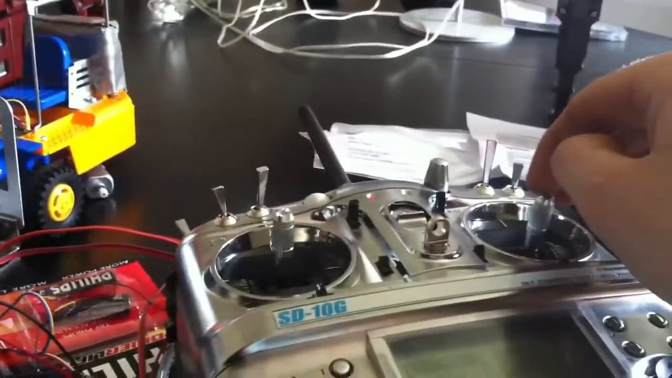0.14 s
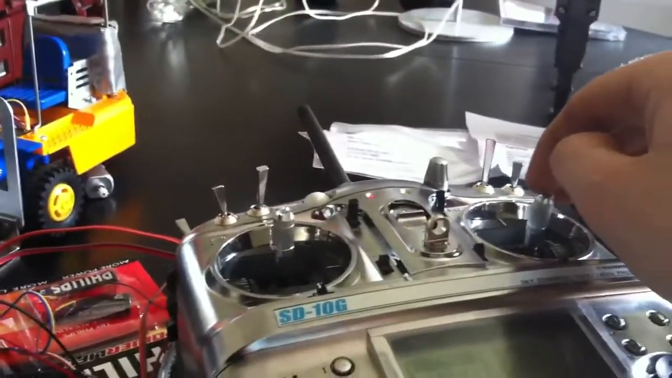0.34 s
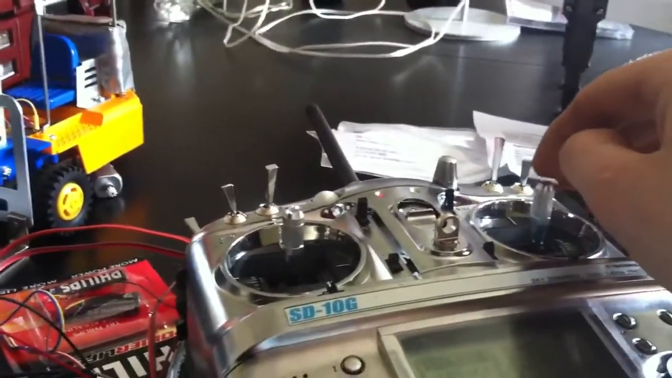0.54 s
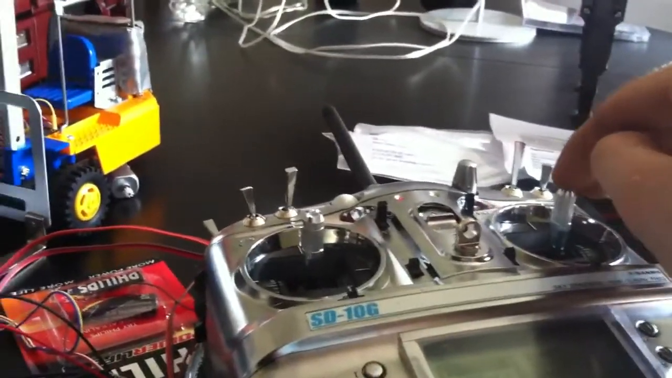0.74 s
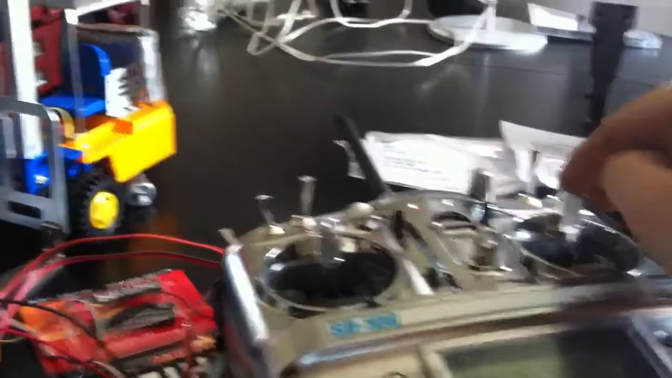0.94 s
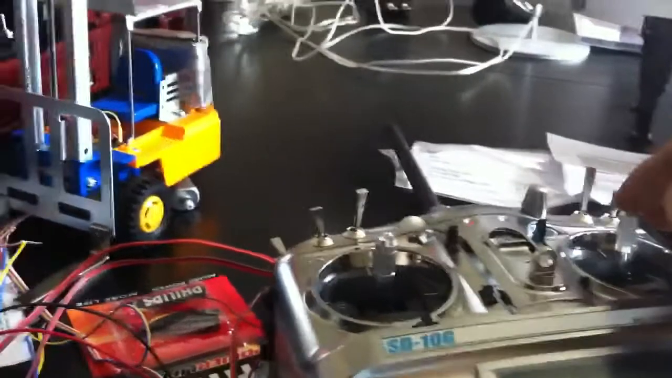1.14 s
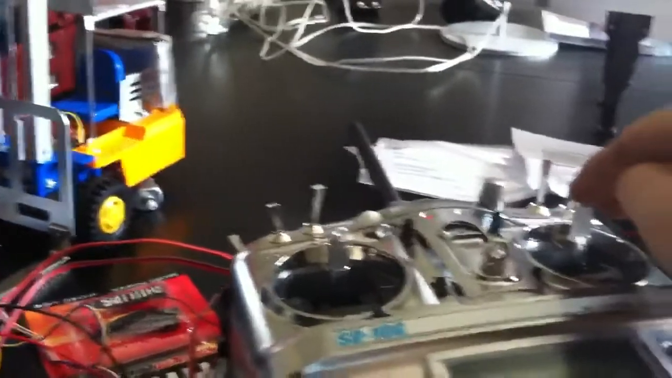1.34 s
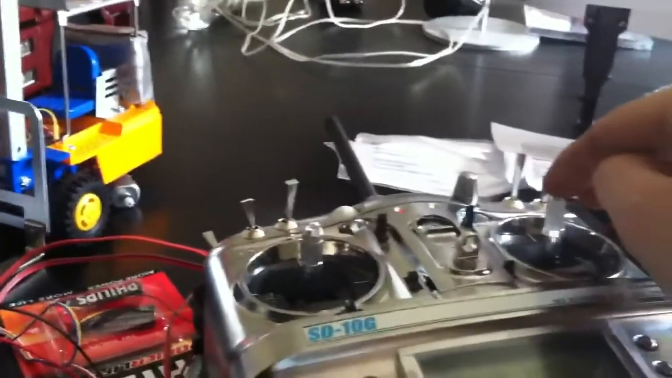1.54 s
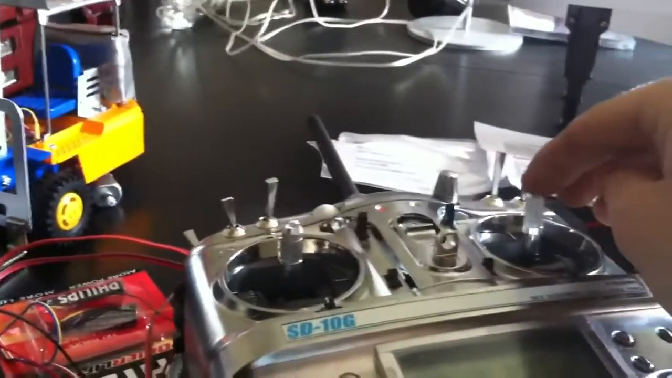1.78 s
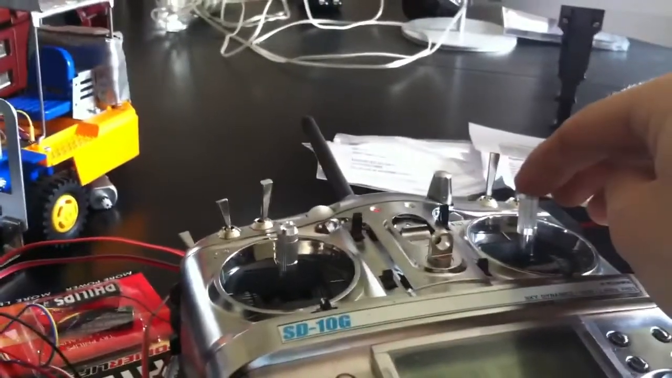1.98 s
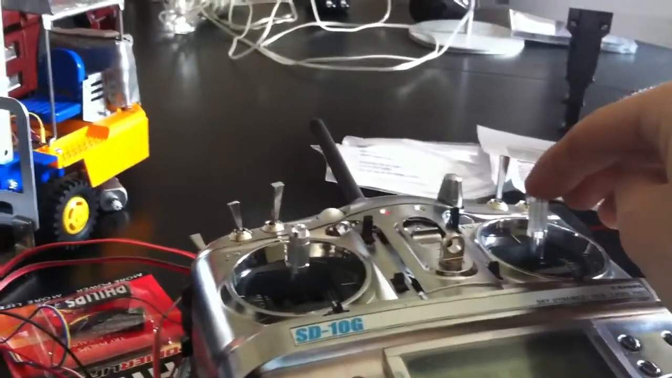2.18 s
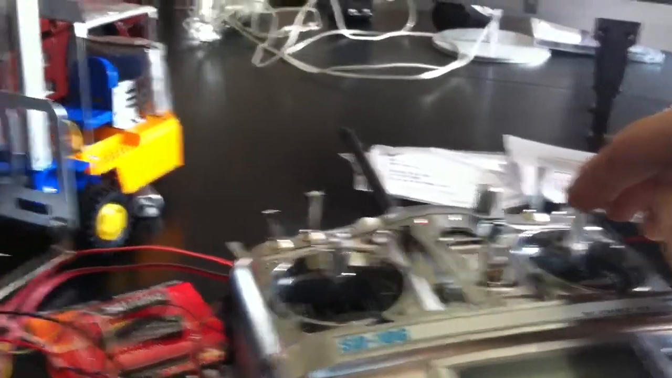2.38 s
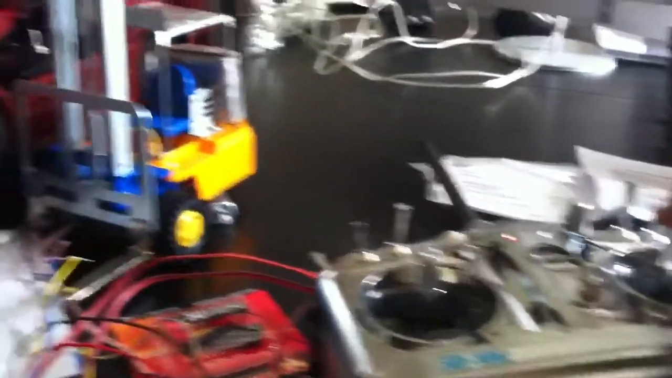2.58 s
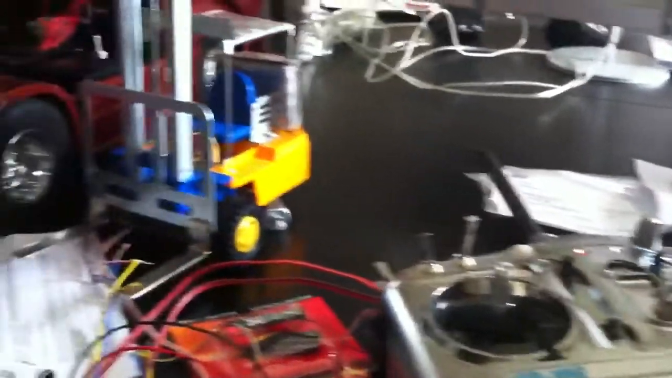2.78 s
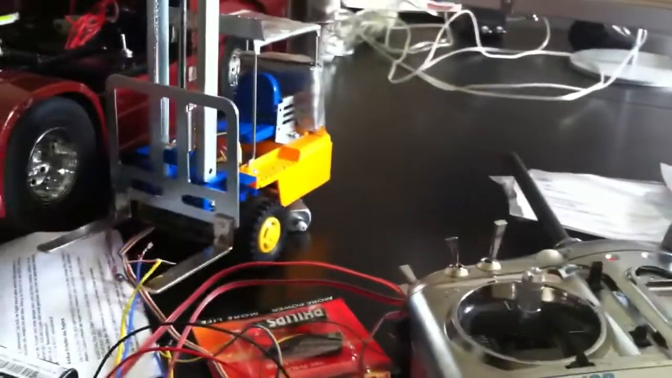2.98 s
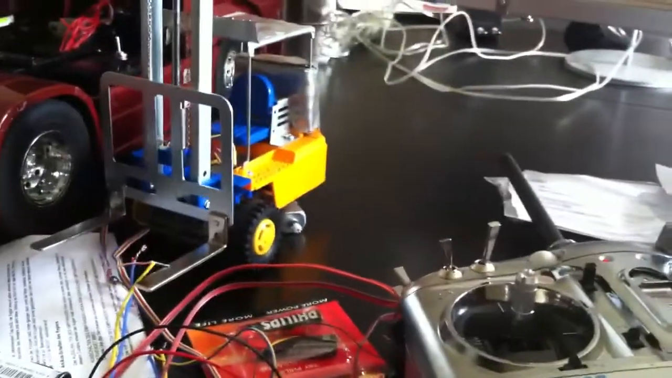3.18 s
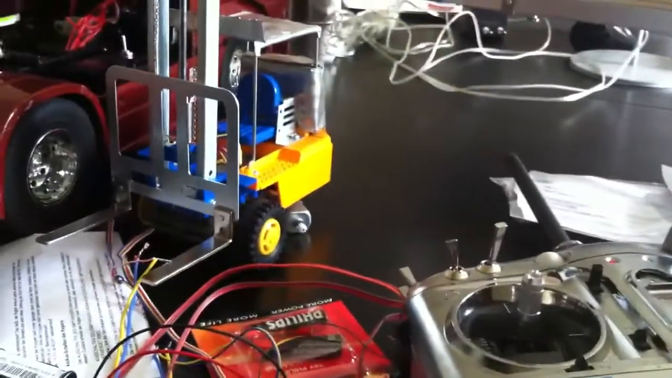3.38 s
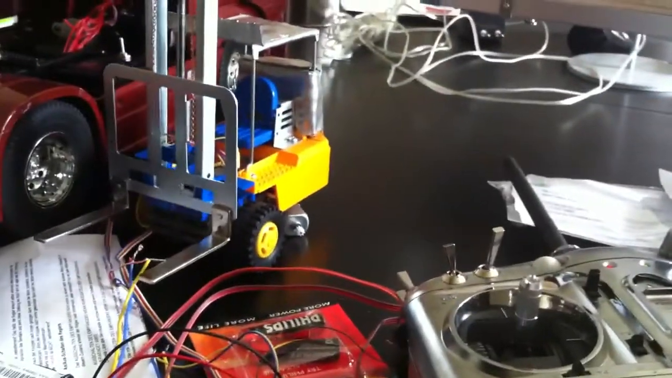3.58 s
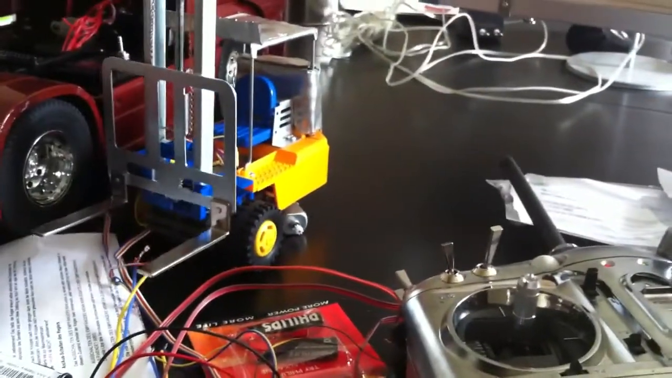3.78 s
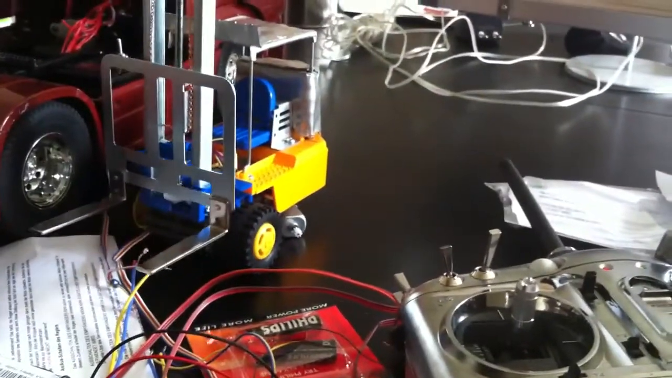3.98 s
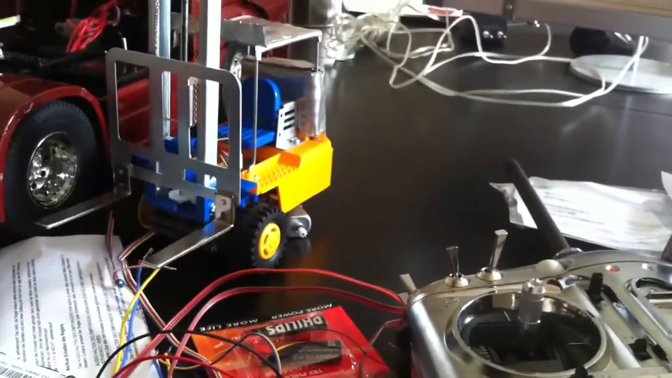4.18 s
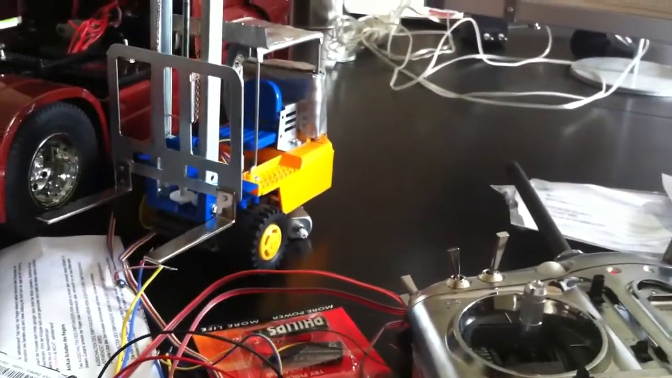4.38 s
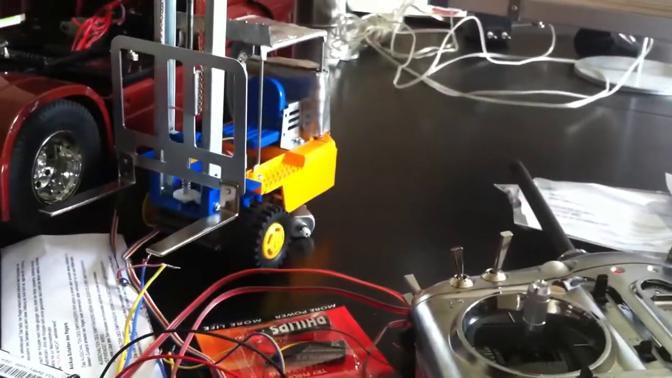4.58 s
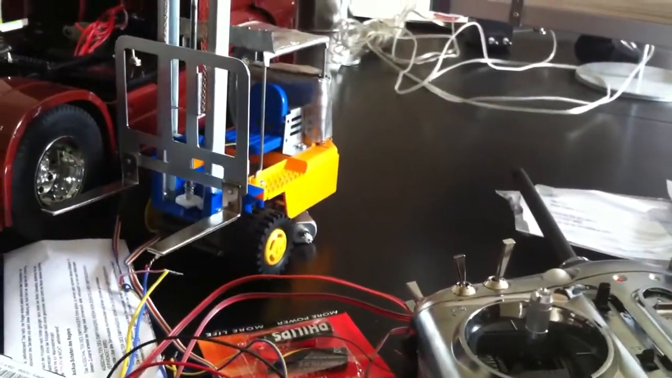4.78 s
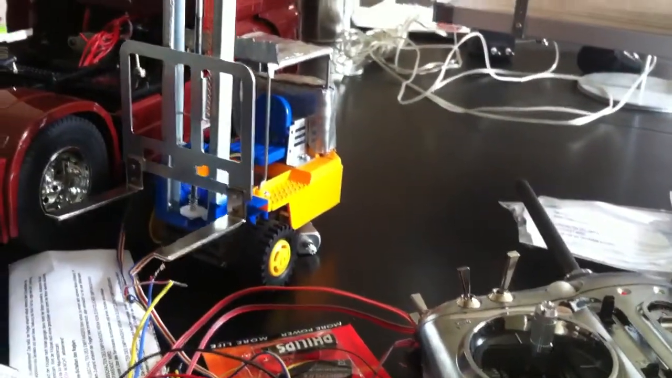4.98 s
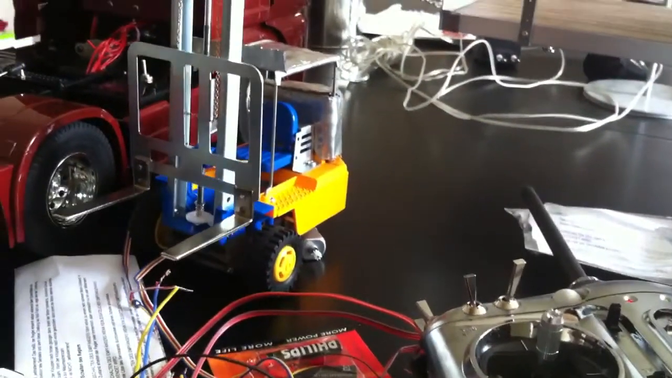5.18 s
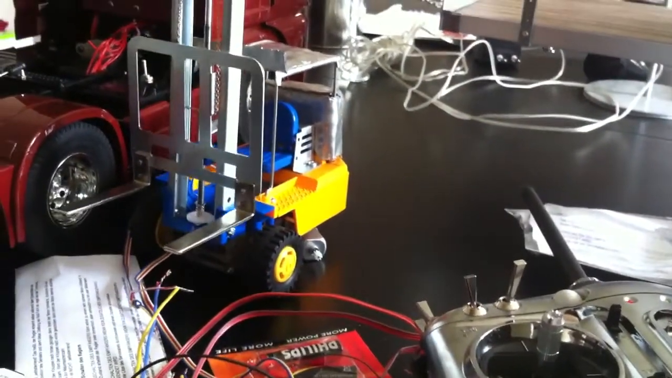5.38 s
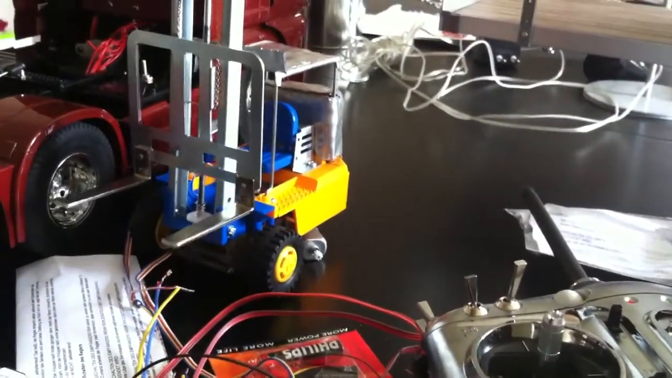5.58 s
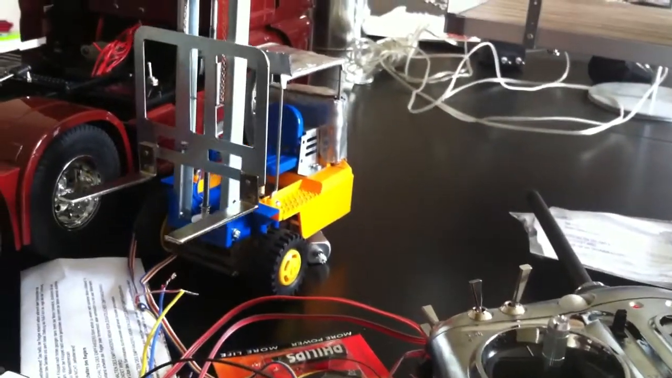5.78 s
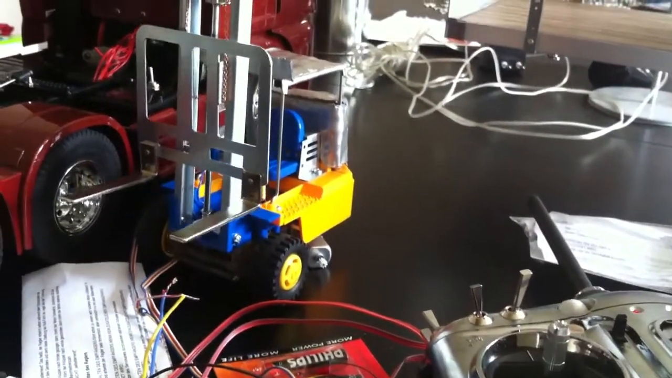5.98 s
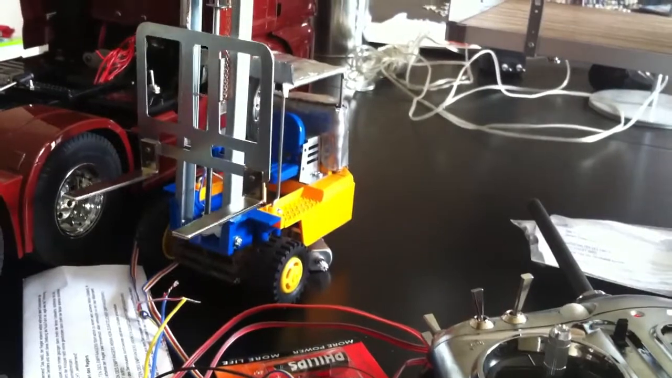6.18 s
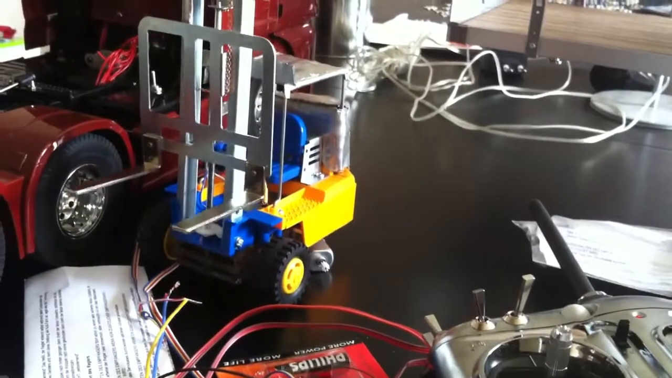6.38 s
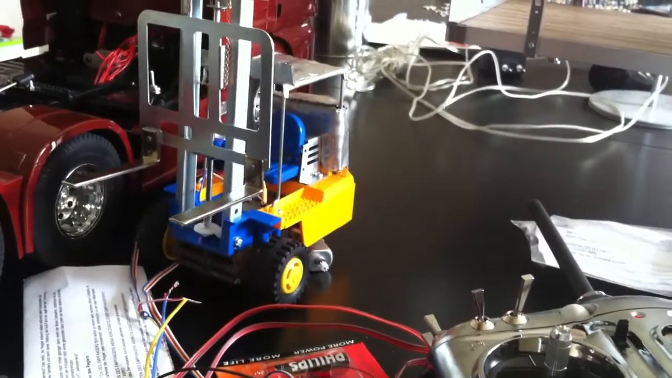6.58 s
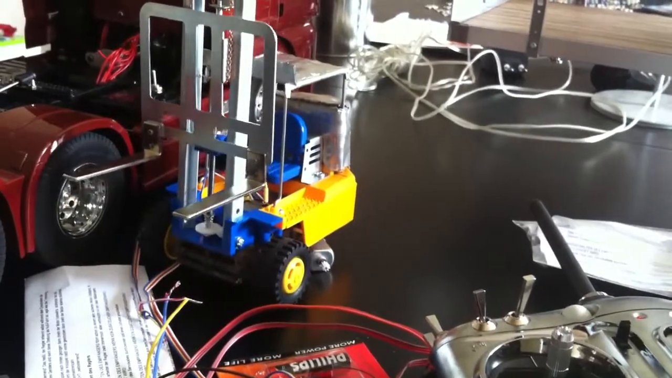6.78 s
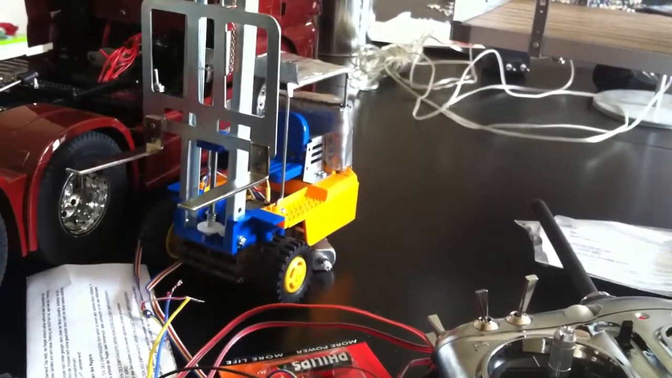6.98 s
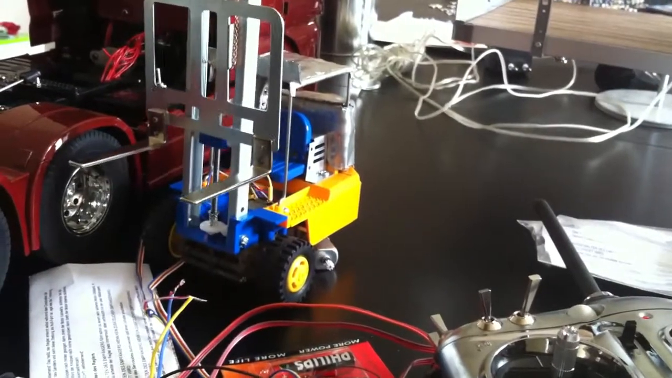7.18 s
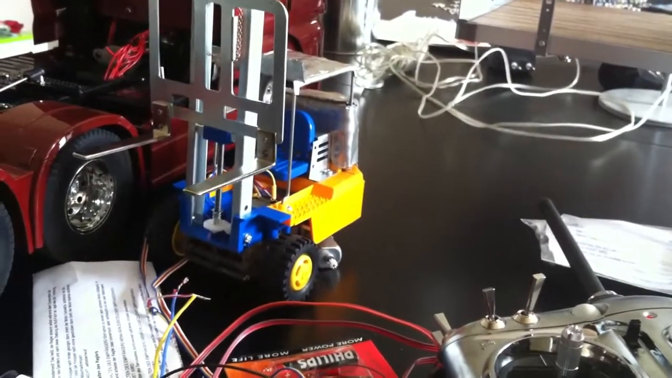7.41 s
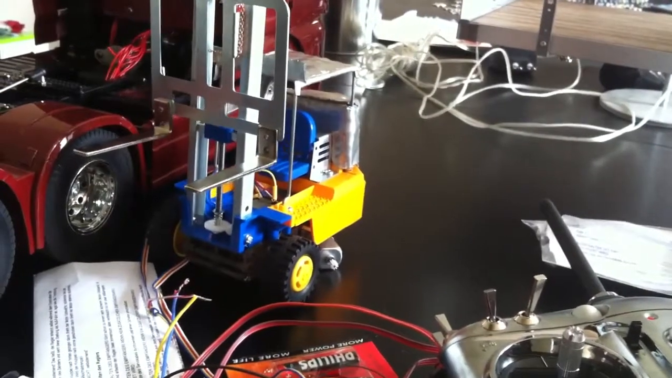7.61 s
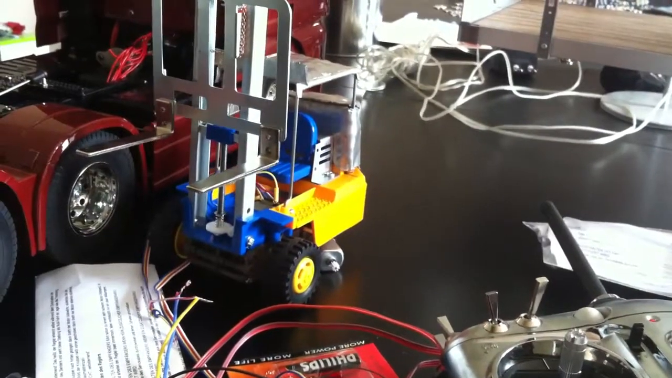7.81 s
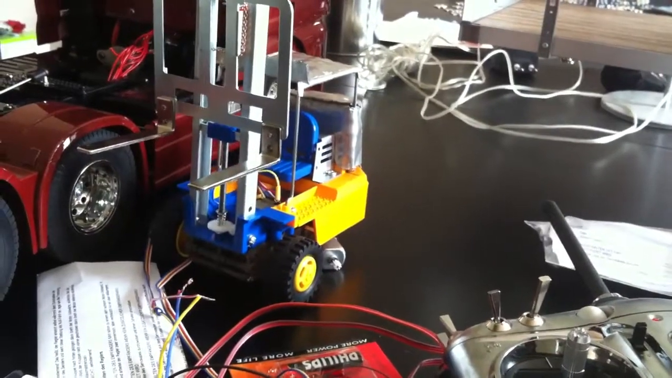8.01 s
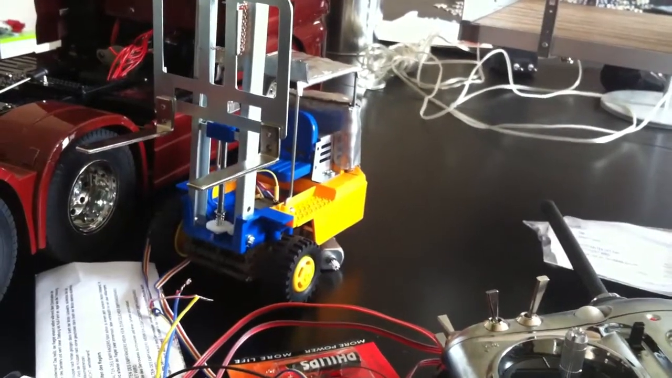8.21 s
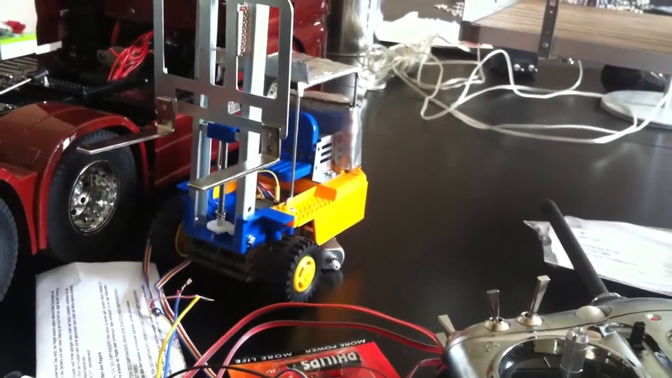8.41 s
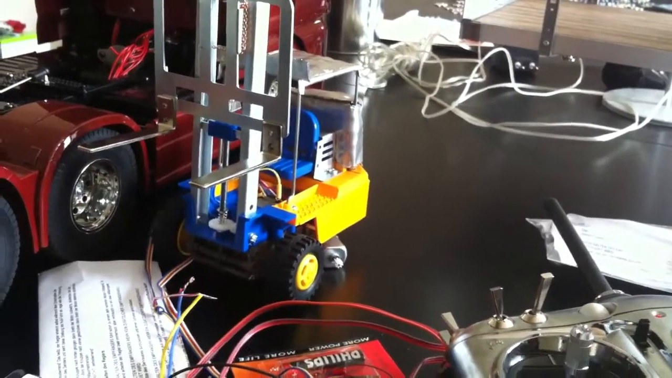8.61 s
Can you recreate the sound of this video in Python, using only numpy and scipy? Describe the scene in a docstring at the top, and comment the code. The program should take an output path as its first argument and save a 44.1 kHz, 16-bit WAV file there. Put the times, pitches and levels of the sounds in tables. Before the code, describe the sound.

A small geared motor in a plastic model forklift buzzes, clacks to a stop, then whines upward, holds steady and winds down in a quiet room.

```python
"""A small geared motor in a plastic model fork lift runs twice on a wooden floor, close to a microphone.
Each shaft turn nearly repeats its clatter, so a stack of sines glides with the speed over puffing noise, the brush
and gear hiss; resonant filters make the plastic housing and the rasping gear case. A wavering tone with overtones is
the speed controller's whistle. Short noise bursts are end-stop clacks, low sagging rings are thumps, and coloured
noise with a few wavering sines is the quiet room with mains hum. Both channels carry the same sound."""
import sys
import numpy as np
from scipy import signal
from scipy.fft import rfft, irfft, next_fast_len
from scipy.io import wavfile
from scipy.ndimage import uniform_filter1d

SR = 44100
rng = np.random.default_rng(int(sys.argv[2]) if len(sys.argv) > 2 else 0)


def level_to_linear(level):
    """Convert decibel levels to linear amplitude factors, elementwise."""
    exponent = np.asarray(level, float) / 20
    return 10 ** exponent


def put_to_file(sound):
    """Save the sound as 16-bit audio at rate SR, in the file named by the first command-line argument."""
    columns = np.atleast_2d(sound).T  # one column per channel
    safe = np.clip(columns, -1, 1)
    whole_steps = np.round(safe * 32767)
    wavfile.write(sys.argv[1], SR, whole_steps.astype(np.int16))


N = 381465
T = np.arange(N) / SR  # time of every sample, s

# broad colour of the plastic housing, before any scaling: pitch_hz [Hz], level_db [dB]
HOUSING_COLOUR = [(88, -29), (150, -26), (244, -18.5), (347, -13), (429, -25.5), (700, -16), (1010, -15),
                  (1110, -19.5), (2380, -4.5), (2840, -6), (3730, -2.5), (7090, -1), (12500, -7),
                  (15800, -17)]


def level(x, db):
    """Scale a sound to an rms level in dB."""
    return x * level_to_linear(db) / np.sqrt(np.mean(x ** 2))


def curve(rows, column=1):
    """Read one column of a table, whose first column is time, at every sample."""
    rows = np.array(rows)
    return np.interp(T, rows[:, 0], rows[:, column])


def by_speed(rows, speed, column):
    """Read one column of a table, whose first column is shaft speed."""
    rows = np.array(sorted(rows))
    return np.interp(speed, rows[:, 0], rows[:, column])


def on_log(points, hz):
    """Read (Hz, dB) points on a log-frequency axis."""
    points = np.array(points)
    return np.interp(np.log(hz + 1), np.log(points[:, 0]), points[:, 1])


def colour(x, gain):
    """Filter a sound by a gain given as a function of frequency."""
    size = next_fast_len(N)
    spectrum = rfft(x, size) * gain(np.fft.rfftfreq(size, 1 / SR))
    return irfft(spectrum, size)[:N]


def walk(rate):
    """Random wandering around 0: straight lines between random values, rate of them a second."""
    return np.interp(T * rate, np.arange(2000), rng.standard_normal(2000))


def resonances(modes, hz):
    """Sum of bell-shaped peaks, each given as (centre Hz, half width Hz, height)."""
    return sum(height / (1 + ((hz - centre) / width) ** 2) for centre, width, height in modes)


def room_tone():
    """Murmur of the room and microphone hiss are coloured noise; mains hum is a few wavering sines."""
    # colour of the murmur and hiss, relative: pitch_hz [Hz], level_db [dB per Hz]
    room_colour = [(18, -62), (30, -42), (114, -8), (141, -1), (174, -0.5), (193, -8), (226, -8),
                   (257, 0.5), (371, -11.5), (402, -6), (536, -14), (12400, -22), (15800, -18)]
    # mains hum, usual strength: pitch_hz [Hz], level_db [dB rms]
    mains_lines = [(150.7, -82), (204.6, -81.5), (253.0, -85.5), (301.5, -82), (398.4, -79)]
    air = level(colour(rng.standard_normal(N), lambda hz: level_to_linear(on_log(room_colour, hz))), -65.5)
    hum = np.zeros(N)
    for hz, db in mains_lines:
        strength = np.sqrt(2) * level_to_linear(db + 3.4 * walk(2.8))
        hum += strength * np.sin(2 * np.pi * (hz * T + rng.random()))
    return air + hum


def echo(x, t60, wet_db):
    """Direct sound plus a dense decaying tail from floor and walls; t60 is its fall by 60 dB in s."""
    t = T[:SR // 2]
    tail = rng.standard_normal(len(t)) * level_to_linear(-60 * t / t60) * (t > .003)
    tail = tail * level_to_linear(wet_db) / np.sqrt(np.sum(tail ** 2))
    return x + signal.fftconvolve(x, tail)[:N]


def thump_sounds():
    """Thumps through the solids: a low, slightly rough ring that sags in pitch as it dies."""
    # start_s [s], level_db [dB before the high-pass], pitch_hz [Hz, where the sag ends], t60_s [s to fall 60 dB]
    thump_rows = [(0.412, -48, 149, 0.1), (.432, -43, 191, 0.069), (.449, -48, 195, 0.22),
                  (.582, -46, 527, .06), (.6, -44.5, 560, 0.072), (0.654, -42, 163, .11),
                  (1.899, -54, 149, 0.14), (5.06, -36.5, 152, .021), (5.981, -30, 170, 0.018),
                  (6.115, -33.5, 152, 0.02)]
    grain = level(colour(rng.standard_normal(N), lambda hz: 1 / (1 + (hz / 90.) ** 2)), -13)
    out = np.zeros(N)
    for start, db, hz, t60 in thump_rows:
        t = np.maximum(T - start, 0)
        cycles = hz * t + 0.3 * (1 - np.exp(-t / 0.003))
        ring = np.sin(2 * np.pi * cycles) * (1 + grain)
        onset = 1 - np.exp(-t / 0.00067)
        out -= level_to_linear(db) * onset * ring * level_to_linear(-60 * t / t60)
    return signal.sosfilt(signal.butter(3, 80., "high", fs=SR, output="sos"), out)


def clack_sounds():
    """Clacks: a burst of noise that rattles in the housing, with a treble tick."""
    # start_s [s], rattle_db and tick_db [dB, gains on the two noises], t60_s [s to fall 60 dB]
    clack_rows = [(0.413, -16, -39, 0.18), (0.433, -43, -16, .063), (.449, -41, -42, .08),
                  (.582, -31, -50, 0.055), (0.654, -24.5, -35, 0.21), (0.748, -64, -23.5, 0.069)]
    rattle = level(colour(rng.standard_normal(N), lambda hz: level_to_linear(0.54 * on_log(HOUSING_COLOUR, hz))), -14.5)
    tick = level(colour(rng.standard_normal(N), lambda hz: 1 / (1 + (12000.0 / (hz + 1)) ** 4)), -16.0)
    out = np.zeros(N)
    for start, rattle_db, tick_db, t60 in clack_rows:
        t = np.maximum(T - start, 0)
        # a sharp first contact, then the rattle dies away
        fade = level_to_linear(-60 * t / t60) + 1.2 * np.exp(-t / 0.00097)
        out += (T > start) * (level_to_linear(rattle_db) * rattle + level_to_linear(tick_db) * tick) * fade
    return out


def controller():
    """The speed controller whistles at its switching rate as the second run starts and gathers speed."""
    # whole whistle: time_s [s], gain_db [dB]
    whistle_gain = [(.95, -96.5), (.97, -59), (1.02, -57), (1.06, -61), (1.1, -56), (1.15, -58),
                    (1.3, -44.5), (1.6, -70)]
    # its tone and overtones in order, one value each, before wavering: relative level [dB]
    overtone_db = [-16, 0, -10, -14, -15, -11, -16, -14, -19, -22]
    centre_hz = 1160.
    pitch = centre_hz * (1 + 0.014 * walk(50.1) + 0.0113 * walk(150))
    phase = 2 * np.pi * np.cumsum(pitch) / SR
    tone = sum(level_to_linear(db + 4.5 * walk(31.7)) * np.sin((k + 1) * phase) for k, db in enumerate(overtone_db))
    return tone * level_to_linear(curve(whistle_gain)) * (T > whistle_gain[0][0]) * (T < whistle_gain[-1][0])


def gear(turns, count=1):
    """Unevenness of the first gear, the same on each of its turns; gives count unrelated patterns."""
    # depth of the swell once, twice, .. around the gear, one value each [share]
    wobble = np.array([0.37, 0.32, 0.15, 0.17, 0.29])[:, None]
    gear_turns = turns / 28  # 28 shaft turns for one turn of the gear
    times_around = np.arange(1, len(wobble) + 1)[:, None]
    angle = rng.random((count, len(wobble), 1)) + times_around * gear_turns
    return np.sum(wobble * np.cos(2 * np.pi * angle), axis=1)


def hums(turns, speed, facing):
    """The three lowest lines of the turn, as the chassis passes them on; each wavers and at times dips or swells."""
    # usual strength: speed [turns per s], once_db, twice_db, three_bars_db [dB rms: once, twice a turn,
    # and the three commutator bars]
    line_levels = [(117, -83, -80, -92), (167, -64.5, -93, -74), (173, -75, -80, -87),
                   (216, -56.5, -76, -68), (240, -75.5, -66, -70), (259, -59.5, -68.5, -61.5),
                   (264, -54, -67, -60), (323, -61, -70, -57.5), (343, -52, -69.5, -58.5),
                   (357, -50, -62, -58), (324, -45, -67.5, -56.5)]
    # brief dips and swells of one line: middle_s [s], half_length_s [s], change_db [dB], line [1, 2 or 3]
    line_changes = [(4.22, 0.17, -24, 1), (4.86, 0.14, -32, 1), (7.15, 0.15, -25, 1), (1.3, 0.035, -31, 2),
                    (2.55, .16, -18, 2), (4.35, 0.059, -26, 3), (3.88, .1, -20, 2), (2.6, 0.19, -8, 3),
                    (5.7, .03, -16, 3), (7.74, 0.071, 16, 1), (1.5, 0.11, -18, 1), (10, 0.062, 15, 1),
                    (4.7, 0.058, -1, 1), (2.8, 0.2, 3, 2), (1.98, 0.081, 3.5, 2)]
    out = 0
    for k in (1, 2, 3):
        db = by_speed(line_levels, speed, column=k) + (.85 if k == 1 else 2.5) * walk(15)
        if k == 1:
            db = db + 5.5 * facing  # imbalance hum is louder until the microphone turns aside
        for middle, half, change_db, line in line_changes:
            if round(line) == k:
                db = db + change_db * np.clip(1 - abs(T - middle) / half, 0, 1)
        swell = 1 + 0.46 * (k > 1) * gear(turns)[0]
        out = out + np.sqrt(2) * level_to_linear(db) * swell * np.sin(2 * np.pi * k * turns)
    return out * (speed > line_levels[0][0])


def rasp(clatter):
    """The same clatter, in uneven bursts, rings the gear case."""
    # resonances of the case: pitch_hz [Hz], half_width_hz [Hz], level_db [dB]
    case_modes = [(2010, 480, 3), (2277, 160, -2), (2415, 180, 10), (3300, 150, -17), (4560, 89, -32),
                  (6970, 83, -46)]
    peaks = [(hz, width, level_to_linear(db)) for hz, width, db in case_modes]
    bursts = clatter * level_to_linear(2.16 * walk(25))
    return level(colour(bursts, lambda hz: resonances(peaks, hz)), 0)


def housing(broad, depth):
    """Gain of the plastic shell: a broad colour with resonances standing out of it, scaled by depth."""
    # resonances: pitch_hz [Hz], half_width_hz [Hz], rise_db [dB before the scaling by depth]
    shell_modes = [(1430, 8.9, 12.5), (2030, 44, 5), (2340, 170, 6.5), (3066, 195, 8.5), (3788, 157, 9),
                   (4340, 390, 5), (4854, 120, 6), (5550, 110, 4.5), (5810, 57, 6), (6270, 180, 4.5),
                   (7073, 230, 8), (7910, 330, 6), (9610, 160, 7.5), (10460, 610, 4.5), (11510, 130, 6.5),
                   (12550, 200, 4.5), (13500, 580, 2)]
    return lambda hz: level_to_linear(on_log(broad, hz) + depth * resonances(shell_modes, hz))


def turn_lines(turns, speed, count=100, size=64):
    """Overtones of the shaft turn; high up every third (three armature poles) is stronger; each flutters alone."""
    # general tilt of the lines: pitch_hz [Hz], level_db [dB, relative]
    tilt = [(500, 11), (1200, 6.5), (2300, 7), (3500, 3), (5500, 3), (9000, 2), (12000, 4.5), (15000, 10.5)]
    # extra for overtones 4 to 20 of the turn, one value each: level [dB, relative]
    wear_db = [3, 3.5, 4, 3.5, 1, 0.5, 1.5, 2, 4, -4, 1, 3, 0.5, 0, 1.5, 3.5, -0.5]
    slow = slice(None, None, size)  # slow changes need only every 64th sample
    out = np.zeros(N)
    swell, swing = gear(turns[slow], count=count), gear(turns[slow], count=count)
    for k in range(4, count):
        hz = k * speed[slow]
        extra_db = wear_db[k - 4] if k <= 20 else 4.3 * (k % 3 == 0)
        gain = level_to_linear(on_log(tilt, hz) + extra_db + 2.0 * walk(6)[slow])
        gain = gain * (1 + 0.88 * swell[k]) * (hz < .4 * SR)
        slip = .7 * swing[k] + .45 * walk(25)[slow] + 2 * np.pi * rng.random()
        phase = 2 * np.pi * k * turns + np.interp(T, T[slow], slip)
        out += np.interp(T, T[slow], gain) * np.sin(phase)
    return out


def brush_hiss(turns, speed):
    """Brush noise that puffs once a turn, and more faintly three times a turn."""
    # puffs die in a fixed time, so they stand apart at low speed
    once = np.exp(-(turns % 1) / speed / 0.0012)
    thrice = 0.26 * np.exp(-(3 * turns % 1) / speed / 0.00063)
    puff = 0.67 + 0.65 * speed / 110.0 + once + thrice
    return level(puff * level_to_linear(1.9 * walk(35)) * rng.standard_normal(N), 0)


def motor():
    """Repeating clatter plus brush hiss, throbbing with the gear, through the housing; low hums come apart."""
    # shaft speed of the two runs as the stick is moved, before wandering: time_s [s], speed [turns per s]
    stick_rows = [(0, 152), (.08, 158), (.15, 160), (.3, 155), (.36, 149), (.417, 136), (.5, 137),
                  (.585, 128), (.63, 85), (.65, 40), (.66, 130), (.72, 30), (.85, 15), (.95, 20),
                  (1.04, 60), (1.2, 120), (1.26, 134.5), (1.35, 166), (1.5, 203), (1.66, 230.5),
                  (1.81, 257.5), (1.935, 276), (2.1, 289.5), (2.34, 300.5), (2.44, 294), (2.67, 288),
                  (2.745, 276), (2.89, 281.5), (3.08, 284), (3.7, 287), (4.0, 299.5), (4.09, 304),
                  (4.39, 308), (4.56, 315.5), (4.7, 317.5), (4.92, 333), (5.13, 347), (5.22, 340),
                  (5.44, 345.5), (5.63, 346), (5.77, 352), (6.1, 351), (6.34, 346), (6.5, 348), (6.9, 346),
                  (6.99, 334), (7.21, 318.5), (7.32, 304.5), (7.45, 269.5), (7.56, 230), (7.68, 175.5),
                  (7.75, 157.5), (7.9, 128), (7.98, 75), (8.06, 28), (8.16, 10)]
    # what the speed sets, before the changes below: speed [turns per s], clatter_db [dB],
    # rasp_db [dB over the clatter], share_db [dB, the share that repeats every turn]
    speed_rows = [(10, -84, -24, -30), (25, -63, -6, -25), (61, -59, 5.5, -15), (122.6, -47, -5.5, -12),
                  (162, -44.5, -7.5, -7), (196, -41, -7.5, -3), (291, -38, -15, -1.24),
                  (335, -36.5, -16.5, -1), (343, -34.5, -18.5, -.5)]
    # broad colour in the first run, heard from another side: pitch_hz [Hz], level_db [dB]
    first_colour = [(88, -42), (150, -11), (217, -26), (712, -52), (785, -24.5), (1160, -19), (1850, -2),
                    (2380, -4), (3520, -2.5), (6430, 1), (10700, -3), (12500, -2.5), (15800, -22)]
    second_run_s, turn_aside_s, stop_s = .9, 2.37, 8.16
    stick = curve(stick_rows)
    speed = stick * (1 + 0.00198 * walk(12))
    turns = np.cumsum(speed) / SR
    first = T < second_run_s
    facing = ~first * np.clip((turn_aside_s - T) / 0.064, 0, 1)  # 1 until the microphone turns aside
    hiss = brush_hiss(turns, speed)
    lines = level(turn_lines(turns, speed), 0)

    # a crawling rotor no longer repeats itself; slowing down (e-folds a second) also changes the share
    slowing = np.maximum(-np.gradient(np.log(stick)), 0) * SR
    slowing = np.minimum(uniform_filter1d(slowing, SR // 10), 4)
    # the first run repeats itself more closely
    share_db = np.minimum(by_speed(speed_rows, stick, column=3) + 4.5 * first, -.3)
    share = level_to_linear(share_db + 0.2 * slowing)
    clatter = share * lines + np.sqrt(1 - share ** 2) * hiss
    # at low speed each turn is heard as a separate beat, deeper in the first run
    beat_depth = (0.17 + 0.23 * first) * np.clip(2 - speed / 158.0, 0, 1)
    clatter = clatter * (1 + beat_depth * np.cos(2 * np.pi * turns))

    # the rasp is fainter until the first run labours
    case = rasp(clatter) * level_to_linear(by_speed(speed_rows, stick, column=2) - 6 * (T < 0.355))
    shell_first = level(colour(clatter, housing(first_colour, depth=0.41)), -0.17)
    shell_second = level(colour(clatter, housing(HOUSING_COLOUR, depth=0.96)), 0)
    shell = np.where(first, shell_first, shell_second)

    # the first run is louder
    load_db = by_speed(speed_rows, stick, column=1) + 8.5 * first - 1 * facing - 0.5 * slowing + 0.4 * walk(9)
    running = (T < stop_s) * level_to_linear(load_db)
    # the first run has a plain imbalance hum in its first third of a second
    imbalance = level_to_linear(-64) * (T < 0.33) * np.sin(2 * np.pi * turns)
    low = hums(turns, stick, facing) * ~first + imbalance
    return running * (shell * (1 + 0.21 * gear(turns)[0]) + case), low


def scene():
    """One microphone, the same sound in both channels."""
    clatter, low = motor()
    airborne = echo(clatter + controller() + clack_sounds(), 0.16, -6.5)
    # thumps and hums travel through the solids, without echo
    mono = airborne + thump_sounds() + low + room_tone()
    return np.array([mono, mono])


def roll_off(x):
    """The treble ends steeply here."""
    return signal.sosfilt(signal.butter(12, 15900, fs=SR, output="sos"), x)


def record(dry):
    """Hand on the finished mix."""
    return roll_off(dry)


dry = scene()
out = record(dry)
put_to_file(out)
```